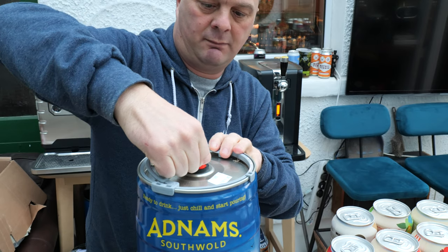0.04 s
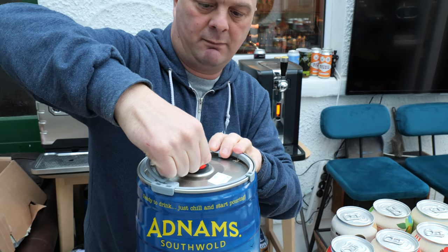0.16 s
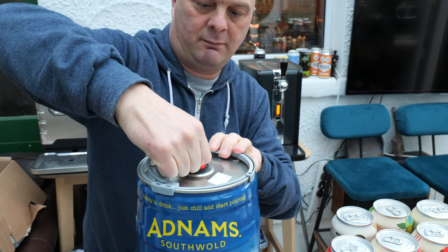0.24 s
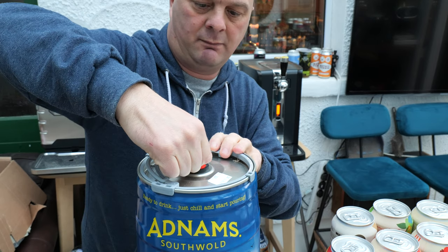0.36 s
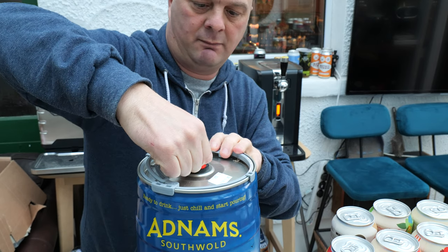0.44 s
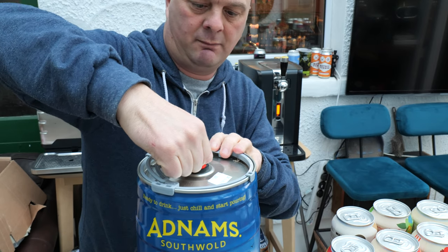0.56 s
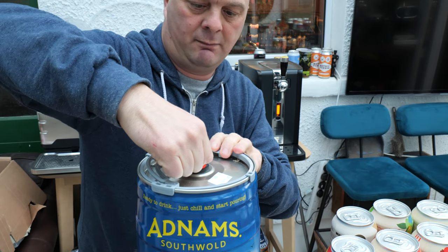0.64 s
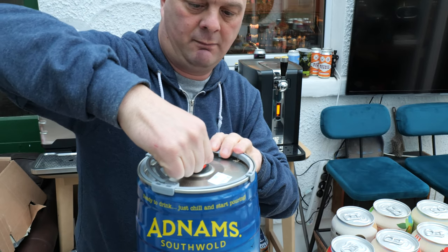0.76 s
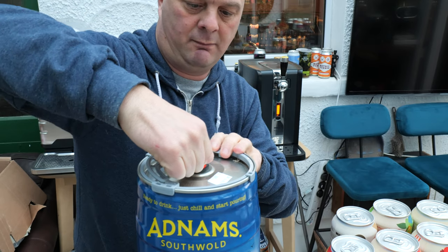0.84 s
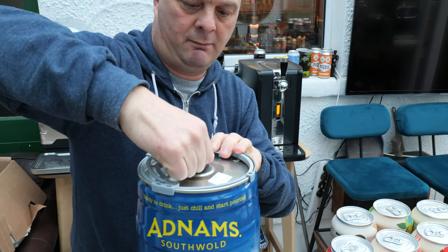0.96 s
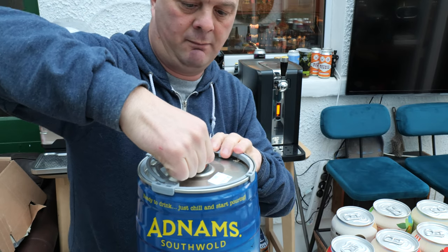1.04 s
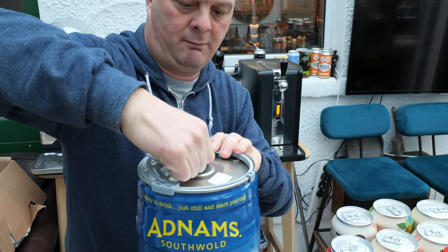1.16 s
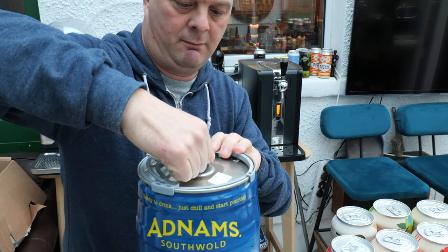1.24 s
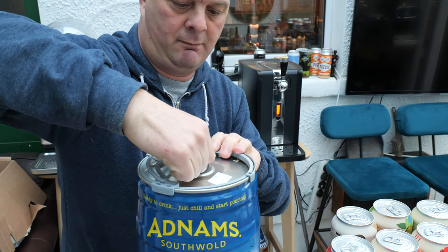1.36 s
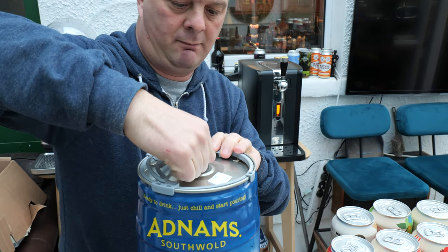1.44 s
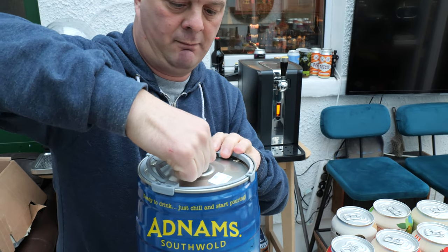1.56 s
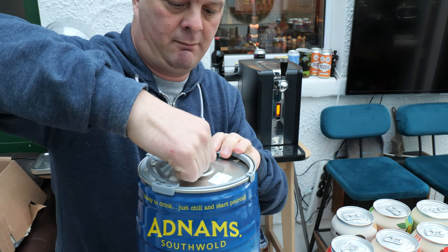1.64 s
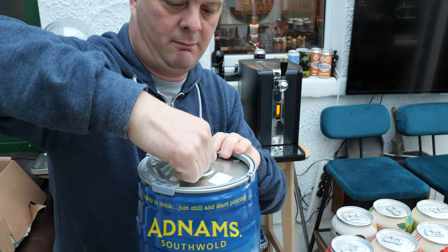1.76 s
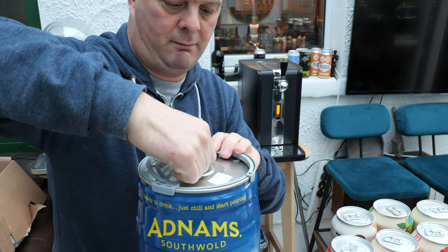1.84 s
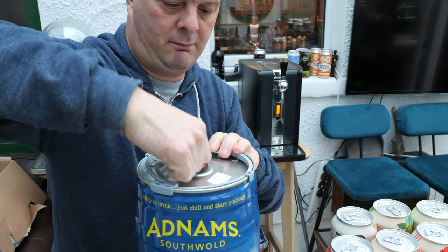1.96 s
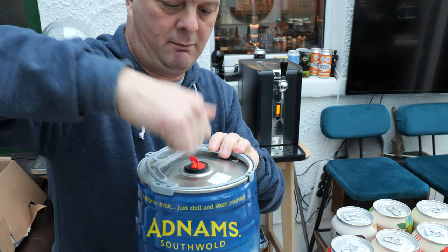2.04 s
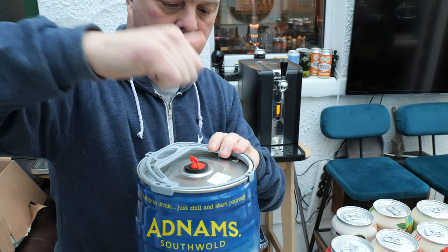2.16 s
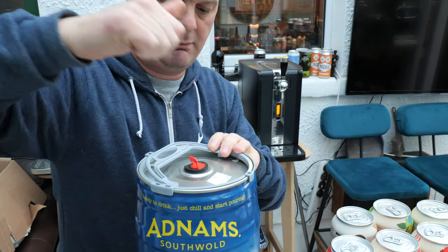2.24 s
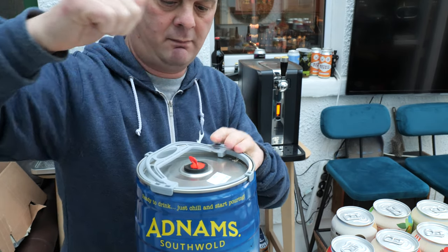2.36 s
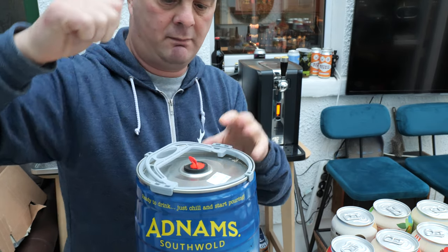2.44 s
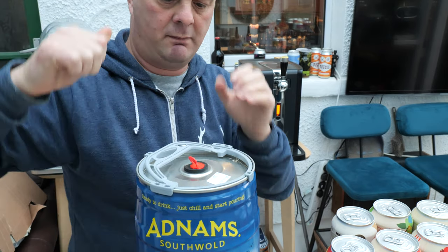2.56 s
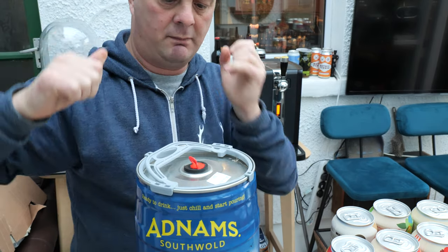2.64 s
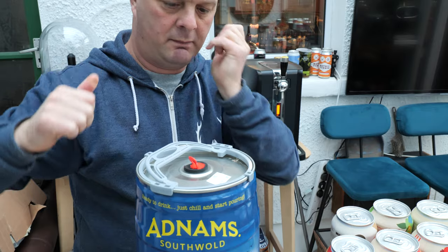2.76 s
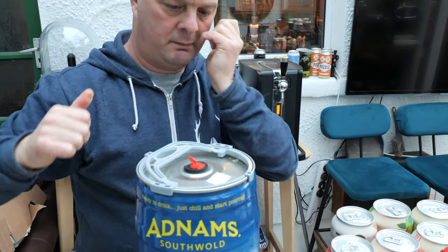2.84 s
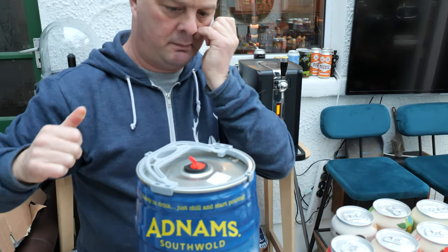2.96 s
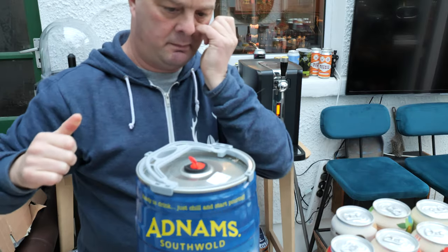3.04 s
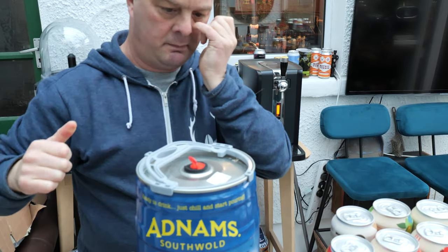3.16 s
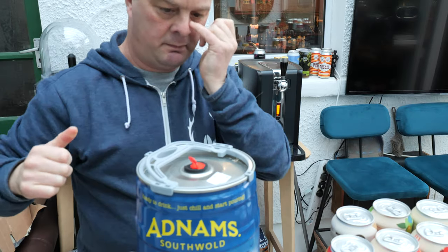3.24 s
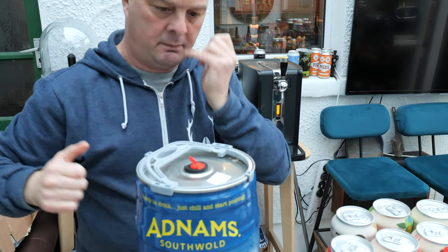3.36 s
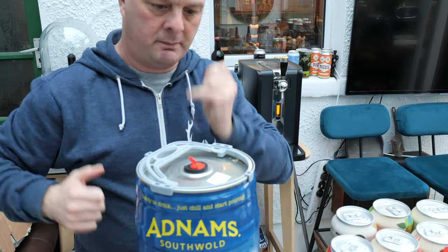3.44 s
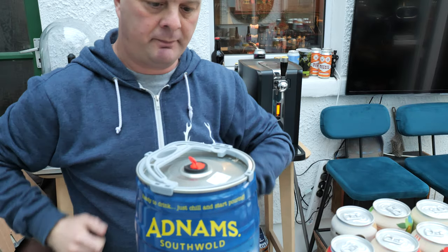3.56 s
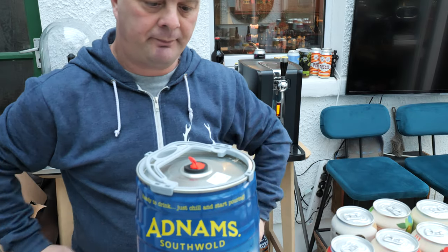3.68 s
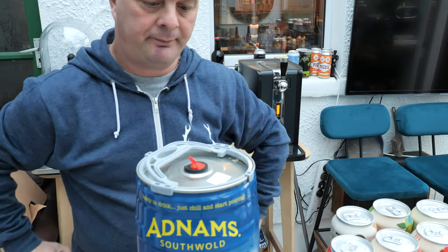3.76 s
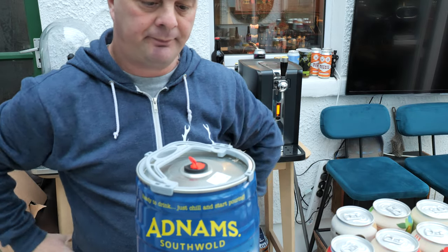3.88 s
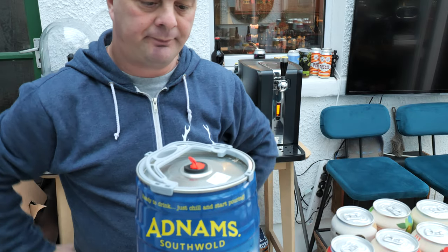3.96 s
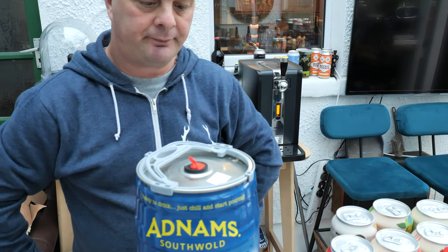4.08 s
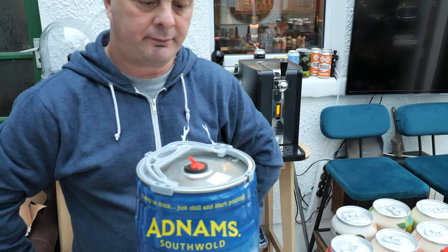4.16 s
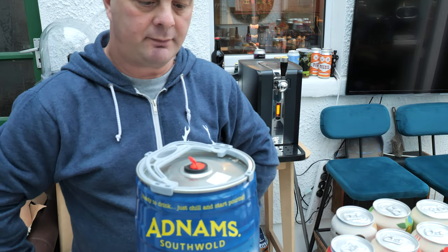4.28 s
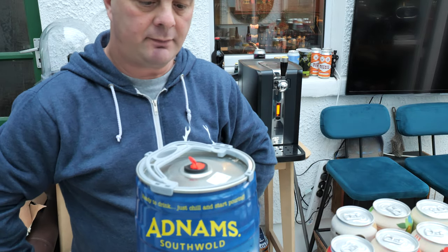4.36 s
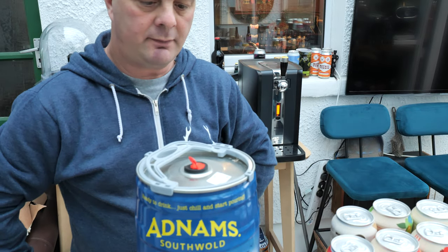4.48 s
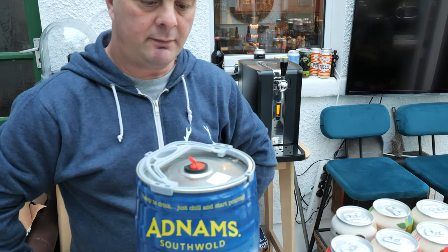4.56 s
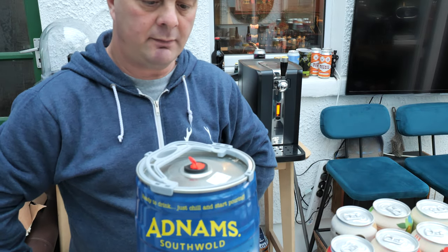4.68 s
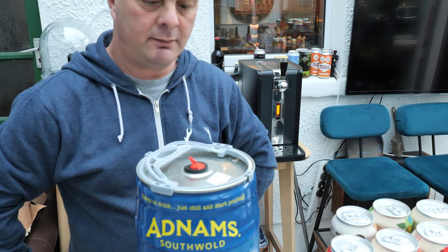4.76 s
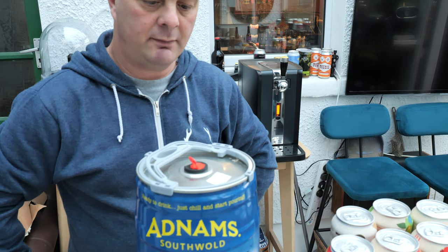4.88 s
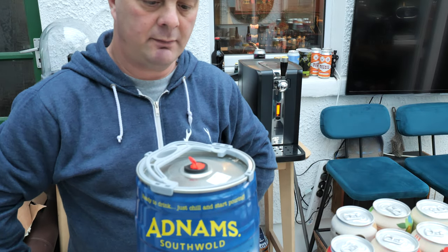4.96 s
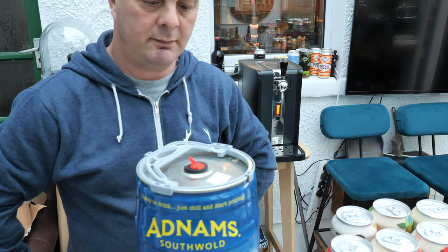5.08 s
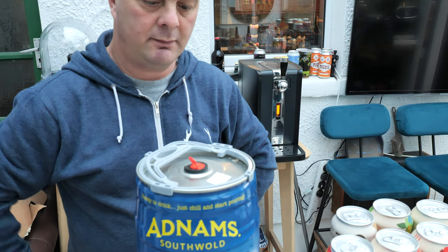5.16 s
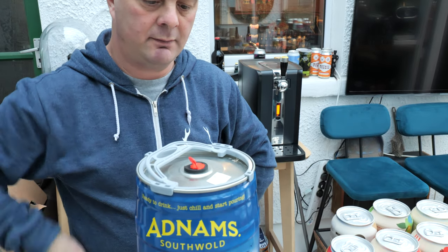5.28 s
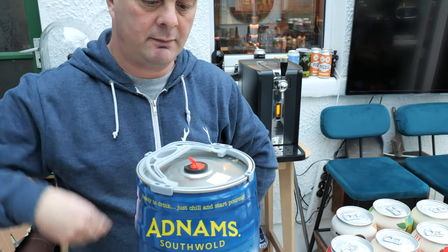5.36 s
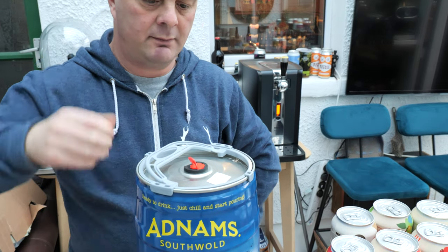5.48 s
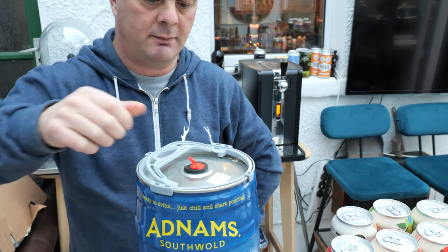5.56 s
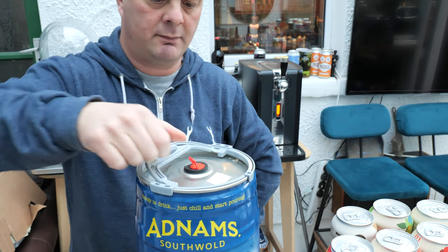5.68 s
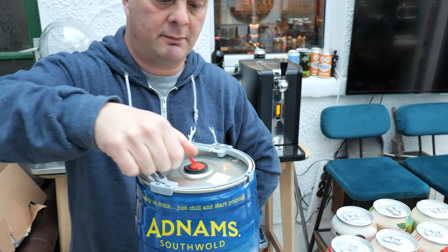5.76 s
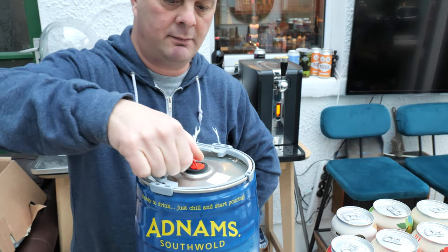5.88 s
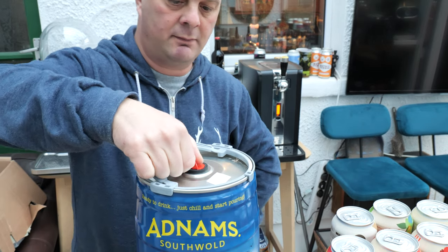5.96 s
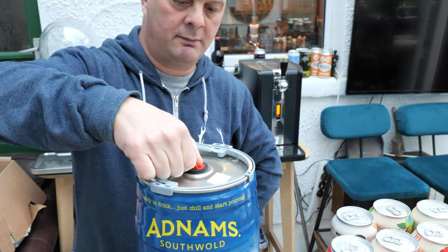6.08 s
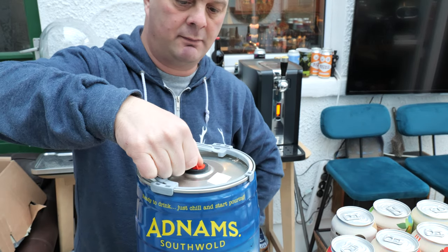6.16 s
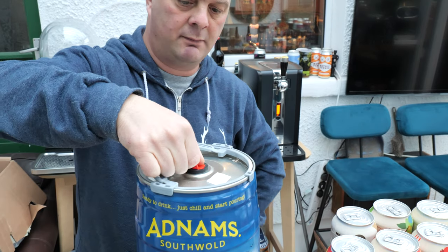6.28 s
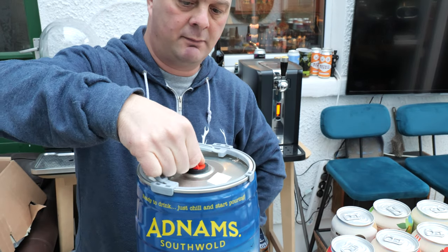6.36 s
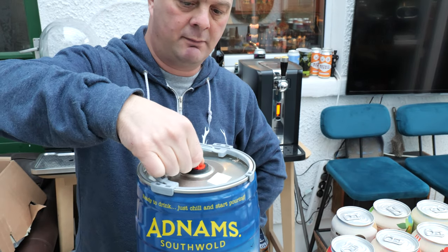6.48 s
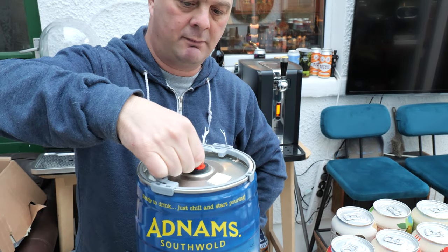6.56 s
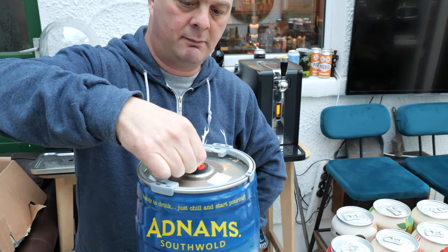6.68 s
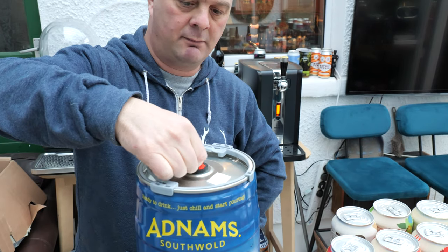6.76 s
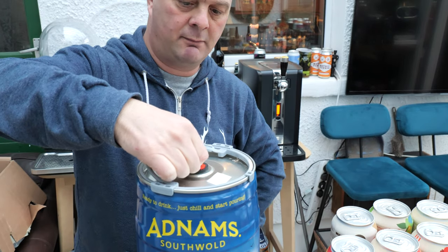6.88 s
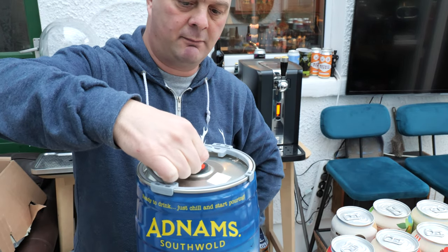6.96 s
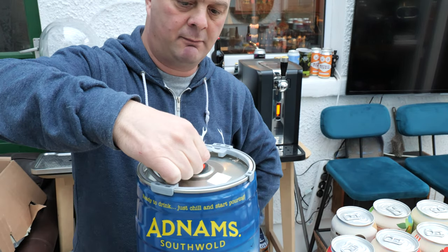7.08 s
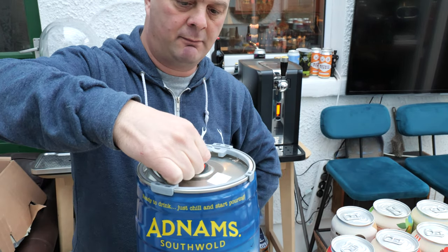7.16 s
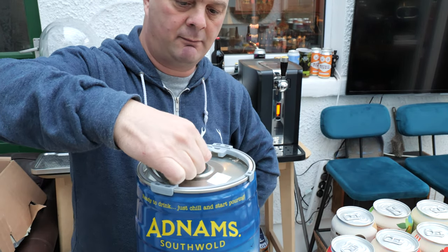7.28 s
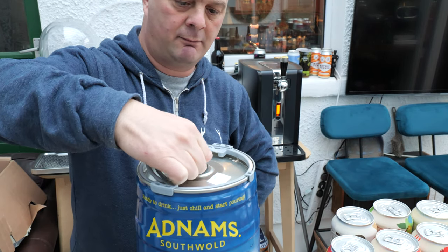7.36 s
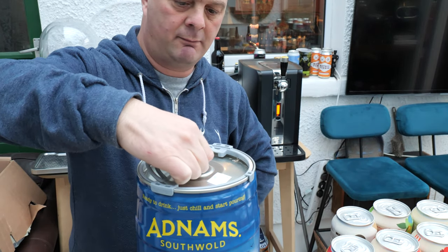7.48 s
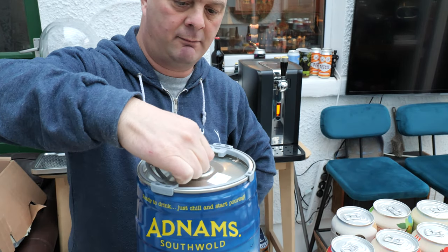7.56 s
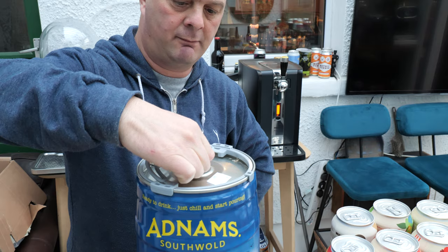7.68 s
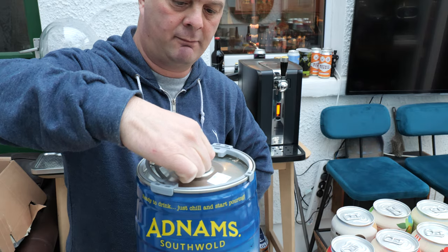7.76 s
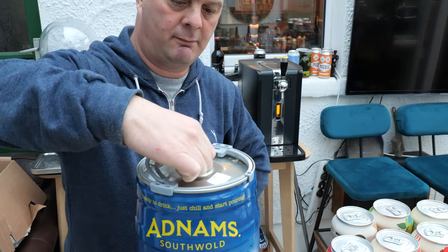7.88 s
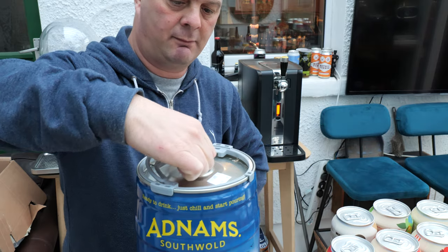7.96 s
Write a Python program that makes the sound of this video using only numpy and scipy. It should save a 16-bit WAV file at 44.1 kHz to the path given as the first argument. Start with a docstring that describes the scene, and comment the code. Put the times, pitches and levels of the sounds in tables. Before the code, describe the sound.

Quiet cooler fans hum, then a small keg's vent opens with a sharp gas hiss that whistles and sizzles, fading as pressure falls.

```python
"""Coolers with fans hum in a small room throughout, under the hiss of a close microphone.
At 1.5 s a hand twists open the vent tap of a small steel keg: filtered noise, a roar with a whistle and sizzle.
At 2 s the hand lets go and the lid rings faintly, as decaying sines; the gas fades as the pressure drops.
Three short knocks, bursts of a few cycles, fall between 4.5 and 5.8 s as the hand returns to cup the lid.
The whistle squeals at 6.3 s; the hand opens the tap further towards 7.2 s, then turns it back."""
import sys
import numpy as np
from scipy import signal
from scipy.io import wavfile
from scipy.ndimage import uniform_filter1d

SR = 44100
rng = np.random.default_rng(int(sys.argv[2]) if len(sys.argv) > 2 else 0)


def wav_record(signal):
    """Record a signal, one row per channel, as 16-bit PCM in the file named by sys.argv[1]."""
    frames = np.transpose(np.atleast_2d(signal))
    bounded = np.clip(frames, -1, 1)
    # unit amplitude maps onto the largest positive 16-bit level
    quanta = np.round(bounded * 32767).astype(np.int16)
    wavfile.write(sys.argv[1], SR, quanta)


N = 354152

FFT_SIZE, HOP = 1024, 256  # [samples]
BIN_HZ = np.fft.rfftfreq(FFT_SIZE, 1 / SR)
FRAME_S = np.arange(N // HOP + 5) * HOP / SR

# Fan wash spectrum: (frequency [Hz], relative density [dB])
FAN_WASH = [(15, -49), (25, -44), (54, -13), (124, -11.5), (185, -2.5), (284, -11.5), (319, -13),
            (376, -7.5), (404, -18), (549, -13.5), (617, -15), (1410, -16.5), (2370, -23.5), (3370, -27.5),
            (7000, -43), (9100, -81), (15400, -120)]
# Humps on the fan wash: (frequency [Hz], width [Hz], height [dB])
FAN_HUMPS = [(560, 33, 7), (1020, 32, 8), (1420, 72, 6.5), (1880, 50, 5.5), (2980, 440, 5)]
# Steady fan tones: (frequency [Hz], level [dB rms], width [Hz])
FAN_TONES = [(187, -61.5, 0.67), (292.7, -69, 2), (374, -74.5, 3.4), (56.7, -77, 5)]
# Pair of tones that comes and goes: (frequency [Hz], relative level [dB], width [Hz])
PAIR_TONES = [(223, -3, 1.5), (276.2, -7.5, 4.2)]
# Level curve of the pair: (time [s], gain [dB])
PAIR_CURVE = [(0, -62), (1.6, -58.5), (1.85, -61), (2.06, -90), (2.3, -58), (4.14, -67), (4.47, -79),
              (5.0, -72), (5.3, -58), (6.78, -63), (7.25, -58.5), (7.6, -86), (8.03, -81)]
# Low drone that swells now and then: (frequency [Hz], relative level [dB], width [Hz])
DRONE_TONES = [(135, -0.5, 3.5), (68.4, -10, 5.1)]
# Level curve of the drone: (time [s], gain [dB])
DRONE_CURVE = [(0, -82), (.87, -86), (1.1, -63), (1.54, -80), (2.91, -60), (4.2, -67), (5.66, -74),
               (6.15, -67), (7.0, -79), (7.38, -64), (7.6, -78), (8.03, -64)]
# Part of any noise that differs left and right: (frequency [Hz], level re common part [dB])
STEREO_SPREAD = [(30, -12), (200, -19.5), (1000, -19.5), (2500, -25), (4000, -100), (15000, -105)]
# Short dull knocks: (time [s], peak [dB], frequency [Hz], cycles each side [1])
KNOCKS = [(4.512, -47, 730, 2.5), (4.894, -37, 230, 0.52), (5.8, -48.5, 1800, 6.7)]
# Fingers leaving the lid: (time [s], level [dB])
LID_TAPS = [(2.005, -43)]
# Keg lid modes: (frequency [Hz], level re tap [dB], t60 [s])
LID_MODES = [(763, 1, 0.71), (823, -3.5, 0.36), (860, -15, .06), (700, -19, .08), (1330, -6, .2)]
# Broad jet noise: (frequency [Hz], relative density [dB])
JET_ROAR = [(250, -22), (450, -23), (900, -17.5), (1500, -15.5), (2500, -9), (3300, -7), (4600, -12),
            (6000, -11), (8100, -6.5), (11000, -5.5), (13500, -1), (15200, -6.5), (16000, -16)]
# Resonances of the lid well, open or under either grip, negative = notch:
# (frequency [Hz], width [Hz], height over roar [dB])
LID_OPEN = [(1530, 300, 5), (3150, 60, 4), (3400, 350, 0.5), (4300, 270, 2), (5150, 300, 4.5),
            (7010, 640, 5.5), (7480, 160, -6), (8320, 370, 3.5), (10280, 870, 5.5), (11330, 500, -5.5),
            (4020, 150, -4.5), (4540, 200, -1)]
LID_TWISTING = [(900, 1600, -3), (2090, 260, -2), (4650, 300, -1), (5750, 490, 5), (7170, 330, 7),
                (8340, 370, 1.5), (10100, 400, 6), (6500, 360, 2), (11300, 500, 5), (12500, 400, -3)]
LID_CUPPED = [(1410, 230, 4.5), (3800, 86, 6), (4720, 260, -3), (5230, 300, 6.5), (6000, 250, 4),
              (7060, 210, 0), (8200, 180, 3.5), (10200, 300, 1.5), (10850, 500, 2), (11850, 200, 6),
              (12300, 200, 6)]
# Sizzle band shape: (offset from centre [Hz], relative level [dB])
SIZZLE_SHAPE = [(-1500, -14), (-900, -7), (-500, 2), (0, 2), (700, -2.5), (1800, -10), (3000, -12)]
# Hand: (time [s], twisting grip [0-2], cupped grip [0-1], sizzle re roar [dB], whistle over roar [dB])
HAND_CURVES = [(1.5, 2, 0, -3, 2), (1.6, 1.7, .1, -5, 7), (1.69, .4, .3, -1.5, 6), (1.78, .8, 0, -7.5, 4.5),
               (1.98, .65, .1, -9, 2), (2.12, .5, 0, -3, 2.5), (2.33, .33, .15, -2.5, 10),
               (2.6, .3, .15, -2, 8.5), (3.9, .05, .15, 0, 8.5), (5.5, 0, .05, -3, 10),
               (5.9, 0, .6, -4, 7.5), (6.26, 0, .8, -6.5, 4), (6.31, .15, .9, -15, 4),
               (6.5, .32, 1, -17.5, 3), (6.9, .3, 1, -13, 3.5), (7.21, .2, 1, -8, 6.5),
               (7.45, .15, 1, -9, 10), (7.75, .1, 1, -20, 9), (8.03, 0, 1, -28, 13)]
# How far the tap is open: (time [s], level added to flow [dB])
TAP_OPENING = [(1.52, -47), (1.55, -29.5), (1.68, -2.5), (1.72, -1.5), (1.8, -.8), (1.9, 1.5), (2.0, .5),
               (2.1, -2), (2.3, .3), (3.5, -.4), (6.26, .6), (6.5, 0), (6.87, .8), (7.21, 7), (7.45, 7.3),
               (7.75, 2), (8.03, -.5)]

FAN_WASH_DB, MIC_HISS_DB, BAND_EDGE_HZ = -60.5, -70, 15730
ROOM_DB, ROOM_T60_S = -10.5, 0.15
# The flow sags ever faster as the keg empties
FLOW_REF_S, FLOW_REF_DB, SAG_DB_PER_S, SAG_DB_PER_S2 = 2.3, -35, 1.3, 0.78
WHISTLE_HZ, WHISTLE_DROP_HZ = 3080, 560  # drop scale, times cupped cubed, before the squeal only
SQUEAL_START_S, SQUEAL_END_S = 6.29, 6.47
SQUEAL_HZ, SQUEAL_OVER_ROAR_DB, SQUEAL_WIDTH_HZ = 2665, 15, 80
SIZZLE_HZ, SIZZLE_TWIST_HZ = 12300, 1000  # centre, rise under the twisting grip
SIZZLE_RISE_START_S, SIZZLE_RISE_END_S, SIZZLE_RISE_HZ = 6.2, 7.3, 1000


def gain_of(db):
    """Decibels to amplitude."""
    return 10 ** (np.asarray(db) / 20)


def evened(x):
    """Scales to rms 1."""
    return x / np.sqrt(np.mean(x ** 2) + 1e-20)


def spectrum_db(points):
    """Interpolates a spectrum table over log frequency, as a column of bins."""
    hz, db = np.transpose(points)
    return np.interp(np.log(BIN_HZ + 1), np.log(hz + 1), db)[:, None]


def humps_db(modes):
    """Sums resonance humps in dB, as a column of bins."""
    return sum(db / (1 + (2 * (BIN_HZ[:, None] - hz) / width_hz) ** 2) for hz, width_hz, db in modes)


def unit_power(magnitude, low_hz, high_hz):
    """Scales every frame to a power sum of 1 within a band."""
    band = (BIN_HZ > low_hz) & (BIN_HZ < high_hz)
    return magnitude / np.sqrt((magnitude[band] ** 2).sum(0))


def curves(table):
    """Interpolates every column of a time table at the frames."""
    time_s, *columns = np.transpose(table)
    return [np.interp(FRAME_S, time_s, column) for column in columns]


def smooth_random(frames):
    """Random curve smoothed over a number of frames, rms 1."""
    return evened(uniform_filter1d(rng.standard_normal(len(FRAME_S)), frames))


def noise(magnitude, patchy_db):
    """Random short-time spectra with drifting patches; an unlike part spreads left and right."""
    a, b, c, d, patches = rng.standard_normal((len(FRAME_S), len(BIN_HZ), 5)).T
    patches = uniform_filter1d(patches, 6, axis=0)  # over bins
    patches = evened(uniform_filter1d(patches, 8, axis=1))  # over frames
    mid = a + 1j * b
    side = gain_of(spectrum_db(STEREO_SPREAD)) * (c + 1j * d)
    spectra = np.array([mid + side, mid - side]) * magnitude * gain_of(patchy_db * patches)
    _, sound = signal.istft(spectra, nperseg=FFT_SIZE, noverlap=FFT_SIZE - HOP)
    return sound[:, :N] * np.sqrt(1.5)  # offsets the loss from overlapping unlike frames


def tone(hz, width_hz, noisy):
    """A steady tone with a share of narrow noise around it, rms 1."""
    pole = np.exp(-np.pi * width_hz / SR)
    wander = signal.lfilter([1], [1, -pole], rng.standard_normal((2, N)))
    wander = evened(wander[0]) + 1j * evened(wander[1])
    carrier = np.exp(2j * np.pi * (hz * np.arange(N) / SR + rng.random()))
    return evened((carrier * (1 + noisy * wander)).real)


def chord(tones, noisy):
    """Sums a table of tones."""
    return sum(gain_of(db) * tone(hz, width_hz, noisy) for hz, db, width_hz in tones)


def coolers():
    """Fans: broad air wash with steady and swelling tones."""
    t = np.arange(N) / SR
    wash = gain_of(spectrum_db(FAN_WASH) + humps_db(FAN_HUMPS))
    wash = unit_power(wash, 230, 5000) * gain_of(FAN_WASH_DB)
    hum = chord(FAN_TONES, noisy=0.22)
    pair = chord(PAIR_TONES, noisy=0.27) * gain_of(np.interp(t, *np.transpose(PAIR_CURVE)))
    drone = chord(DRONE_TONES, noisy=0.34) * gain_of(np.interp(t, *np.transpose(DRONE_CURVE)))
    return noise(wash, patchy_db=0.9) + hum + pair + drone


def room(x):
    """Sparse decaying echoes of random sign; their fixed pattern ripples the hiss spectrum finely."""
    slots = np.arange(60, 12000, 20)
    delays = slots + rng.integers(0, 20, len(slots))  # [samples]
    taps = np.zeros(12020)
    taps[delays] = rng.choice([-1., 1.], len(delays)) * gain_of(-60 * delays / SR / ROOM_T60_S)
    taps = gain_of(ROOM_DB) * taps / np.linalg.norm(taps)
    echoes = signal.oaconvolve(x, taps[None])[:, :N]
    return (x + echoes) / np.hypot(1, gain_of(ROOM_DB))


def knocks():
    """Heavily damped thuds: a few cycles under a bell-shaped envelope, with no ring."""
    t, out = np.arange(N) / SR, 0
    for time_s, db, hz, cycles in KNOCKS:
        envelope = np.exp(-((t - time_s) * hz / cycles) ** 2)
        out = out - gain_of(db) * np.cos(2 * np.pi * hz * (t - time_s)) * envelope
    return out


def lid_ring():
    """Letting go excites the modes of the steel lid, each decaying at its own rate."""
    t, out = np.arange(N) / SR, 0
    for time_s, db in LID_TAPS:
        since_s = np.maximum(t - time_s, 0)
        for hz, mode_db, t60_s in LID_MODES:
            decay = gain_of(db + mode_db - 60 * since_s / t60_s)
            out = out + decay * np.sin(2 * np.pi * hz * since_s)
    return out


def gas_flow_db():
    """Flow level from the falling keg pressure and the tap opening."""
    since_s = FRAME_S - FLOW_REF_S
    pressure_db = FLOW_REF_DB - SAG_DB_PER_S * since_s - SAG_DB_PER_S2 * since_s ** 2
    return pressure_db + curves(TAP_OPENING)[0]


def whistle(twist, cupped, over_roar_db):
    """Whistle resonance: sags in pitch as the hand closes, until the squeal, when fingers pinch the tap
    and it narrows; then it returns to its open pitch."""
    squealing = (FRAME_S > SQUEAL_START_S) & (FRAME_S < SQUEAL_END_S)
    drop_hz = WHISTLE_DROP_HZ * cupped ** 3 * (FRAME_S < SQUEAL_START_S)
    hz = np.where(squealing, SQUEAL_HZ, WHISTLE_HZ - drop_hz)
    width_hz = np.where(squealing, SQUEAL_WIDTH_HZ, 235 + 130 * twist + 300 * cupped)
    height_db = np.where(squealing, SQUEAL_OVER_ROAR_DB, over_roar_db)
    waver = 1 + 0.0033 * smooth_random(8)
    return humps_db([(hz * waver, width_hz, height_db)])


def jet():
    """Turbulent roar through the tap and lid resonances, plus a high sizzle from the narrow gap."""
    hz = BIN_HZ[:, None]
    flow_db = gas_flow_db()
    twisting, cupped, sizzle_db, whistle_db = curves(HAND_CURVES)
    twist = np.minimum(twisting, 1)

    free = np.clip(1 - twisting - cupped, 0, 1)
    lid_db = free * humps_db(LID_OPEN) + twisting * humps_db(LID_TWISTING) + cupped * humps_db(LID_CUPPED)
    treble_db = -3.5 - 4.5 * twist - 11 * cupped  # the hand dulls the top
    roar_db = spectrum_db(JET_ROAR) + lid_db + whistle(twist, cupped, whistle_db)
    roar_db = roar_db + treble_db * np.clip((hz - 8500) / 3000, 0, 1)
    # a slow jet keeps more of its lows
    lows_db = 0.57 * (-34 - flow_db) * (1 - twisting)
    roar_db = roar_db + lows_db * np.clip(1 - hz / 2500, 0, 1)
    roar = unit_power(gain_of(roar_db), 2100, 10500)

    # the sizzle climbs as the tap is turned again
    climb_hz = np.interp(FRAME_S, [SIZZLE_RISE_START_S, SIZZLE_RISE_END_S], [0, SIZZLE_RISE_HZ])
    centre_hz = SIZZLE_HZ + SIZZLE_TWIST_HZ * twist + climb_hz
    offset_hz, shape_db = np.transpose(SIZZLE_SHAPE)
    sizzle = gain_of(np.interp(hz - centre_hz, offset_hz, shape_db, left=-60) + lid_db)
    sizzle = gain_of(sizzle_db) * unit_power(sizzle, 11840, 19000)

    sputter_db = 0.48 * smooth_random(4)
    tap_open = FRAME_S > TAP_OPENING[0][0]
    level = gain_of(flow_db + sputter_db) * tap_open
    return noise(np.sqrt(roar ** 2 + sizzle ** 2) * level, patchy_db=1.0)


def scene():
    """Coolers, knocks, lid and the jet with its room echoes."""
    return coolers() + knocks() + lid_ring() + room(jet())


def record(dry):
    """Microphone: own hiss in each channel, deep bass roll-off, upper band limit."""
    hissy = dry + gain_of(MIC_HISS_DB) * rng.standard_normal(dry.shape)
    bass_cut = signal.butter(2, 40, "high", fs=SR, output="sos")
    thinned = signal.sosfilt(bass_cut, hissy)
    band_limit = signal.firwin(1023, BAND_EDGE_HZ, window=("kaiser", 9), fs=SR)
    return signal.oaconvolve(thinned, band_limit[None], "same")


dry = scene()
out = record(dry)
wav_record(out)
```